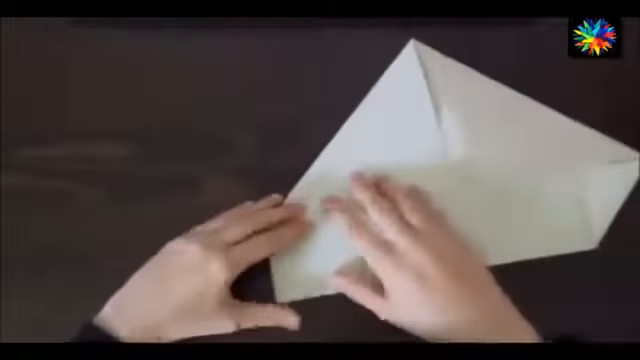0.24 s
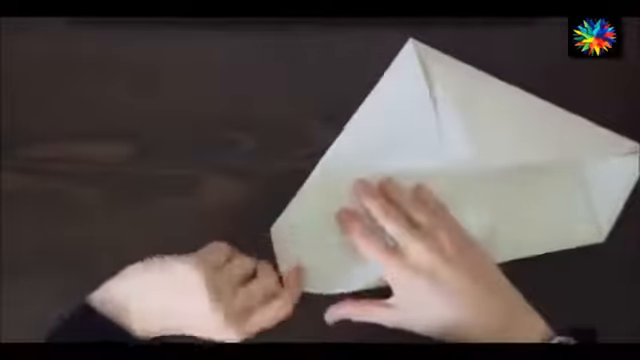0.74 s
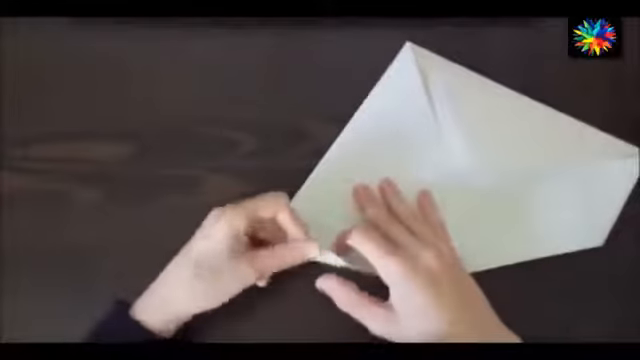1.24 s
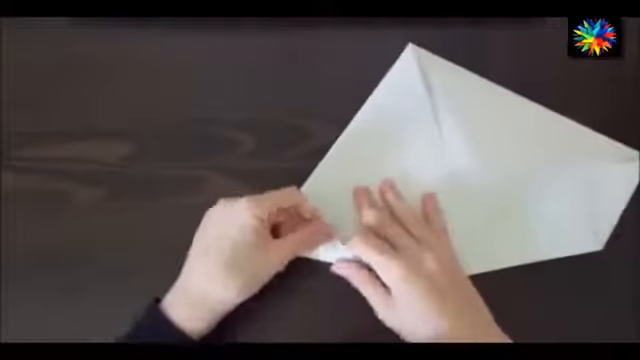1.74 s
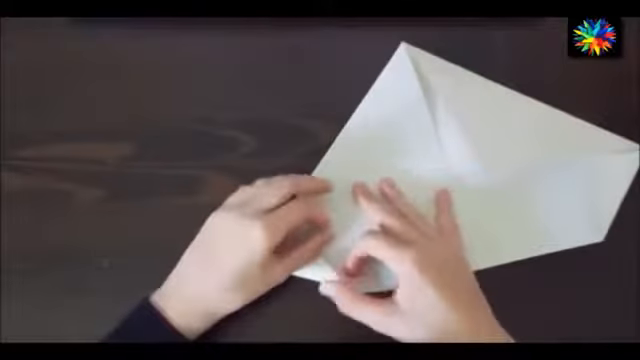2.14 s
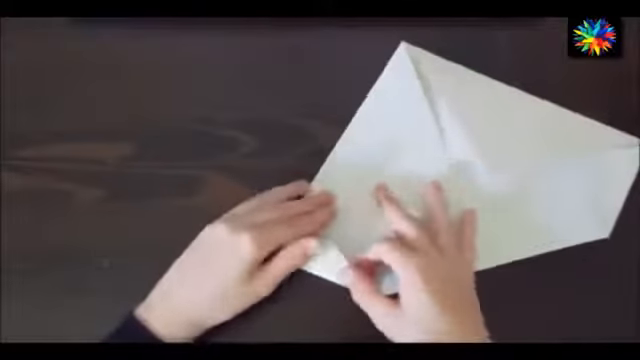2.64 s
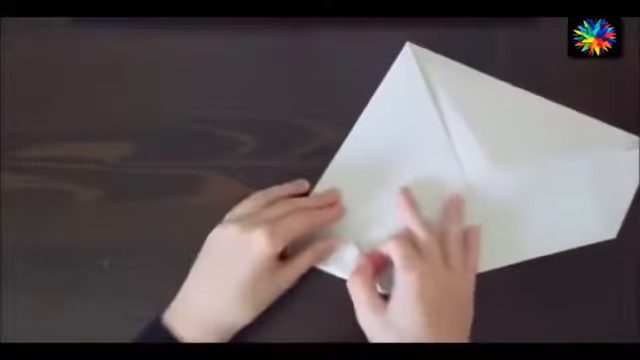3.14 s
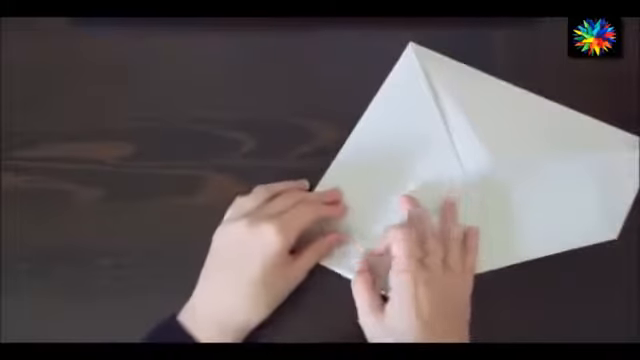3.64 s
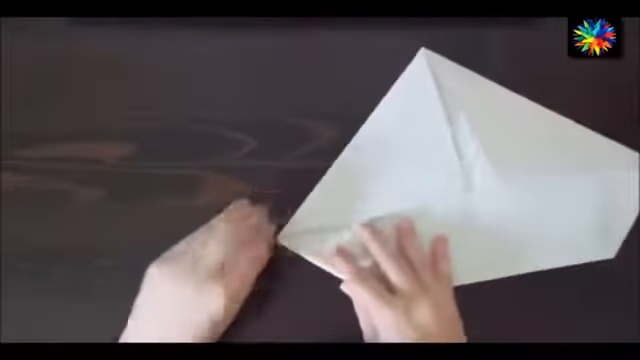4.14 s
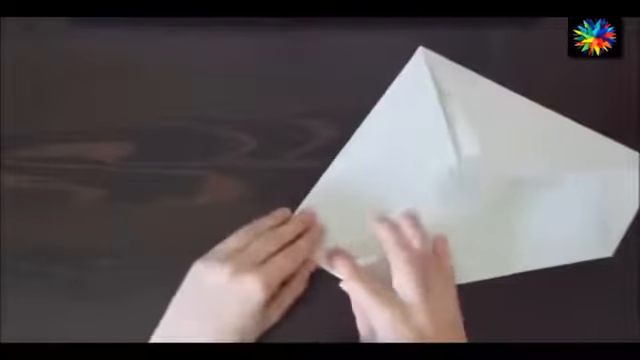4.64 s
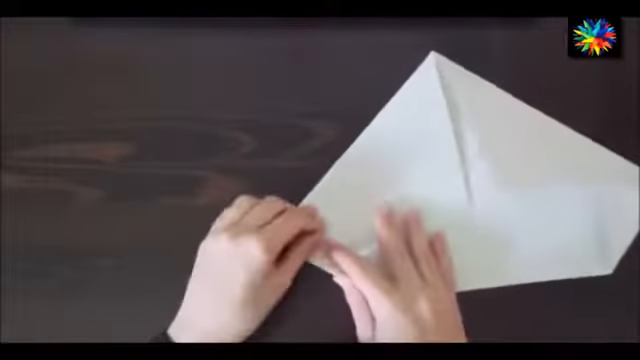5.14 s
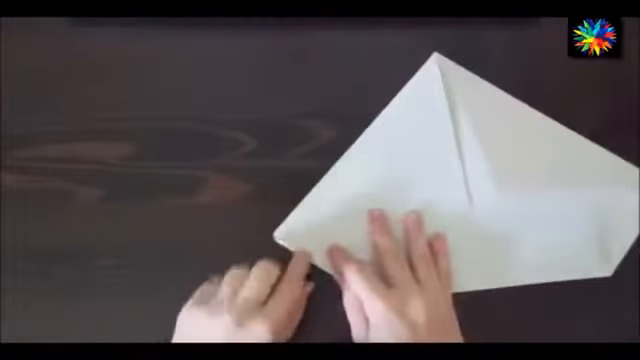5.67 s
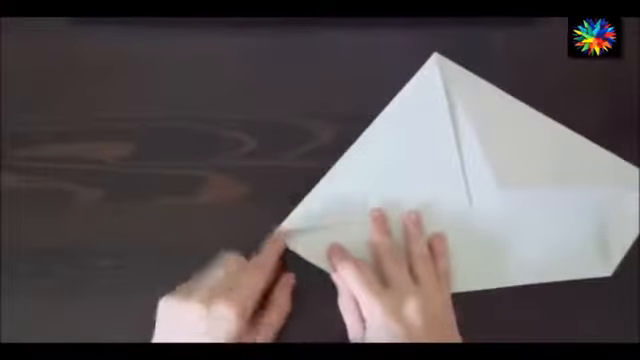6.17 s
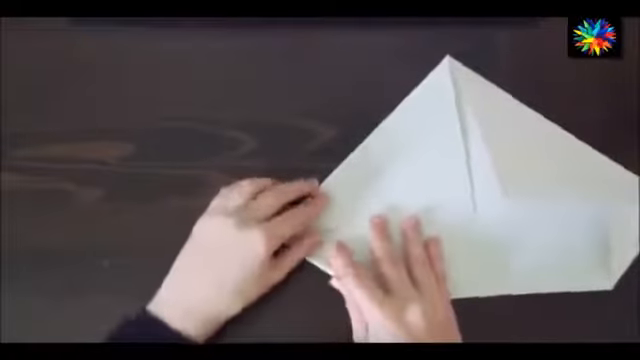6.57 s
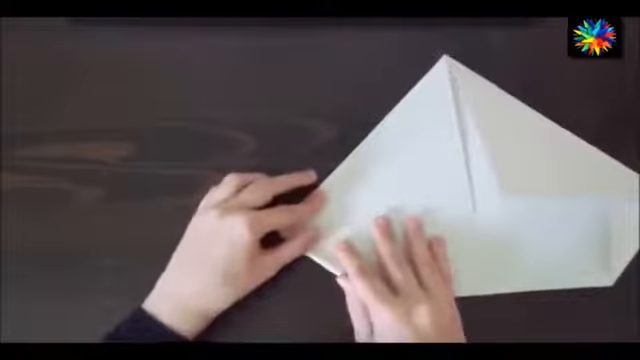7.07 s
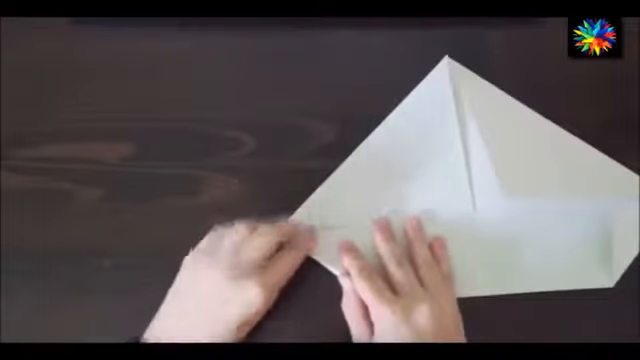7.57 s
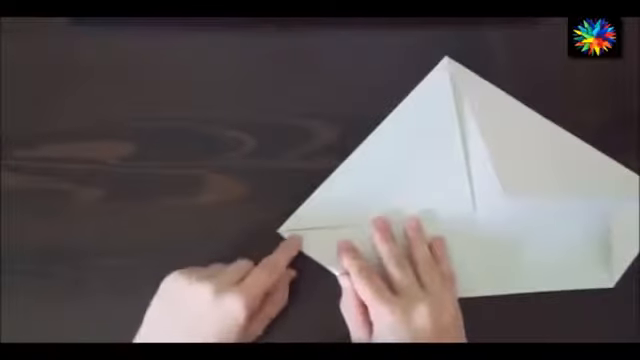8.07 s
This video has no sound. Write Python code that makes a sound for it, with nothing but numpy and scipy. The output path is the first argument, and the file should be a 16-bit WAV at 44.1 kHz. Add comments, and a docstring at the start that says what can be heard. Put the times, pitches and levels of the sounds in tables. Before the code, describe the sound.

Hands fold and crease the corner of a sheet of paper on a wooden table, close to the microphone. Fingers slide in short hissing strokes while the paper rasps and crackles, with one sharp snap standing out before the middle. Soft fingertip thuds and a few dull knocks from further off come in between. The rubbing grows fainter and sparser toward the end, in a small quiet room.

```python
"""A soft hiss of fingers sliding on paper comes first, with a tick, a thud and a short rasp.
Two hands are folding and creasing the corner of a sheet on a wooden table in a small quiet room.
The hiss comes from fibres that catch and let go. The sheet rasps as it bends and snaps sharply
where it buckles. Fingers land on the table with soft thuds, and a few dull knocks sound further off."""
import sys
import numpy as np
from scipy import signal
from scipy.fft import rfft, irfft
from scipy.io import wavfile
from scipy.ndimage import uniform_filter1d, minimum_filter1d, map_coordinates

SR = 44100
rng = np.random.default_rng(int(sys.argv[2]) if len(sys.argv) > 2 else 0)


def materialize(psi):
    """Save the field psi as 16-bit PCM at rate SR to the path in sys.argv[1].

    A 1-D psi becomes a single channel; in a 2-D psi each row is a channel.
    """
    bounded = np.clip(np.atleast_2d(psi).T, -1, 1)
    quanta = np.round(bounded * 32767).astype(np.int16)
    wavfile.write(sys.argv[1], SR, quanta)


N = 366471
TIME = np.arange(N) / SR

# moments when the sheet buckles: t/s, relative low, middle and treble level/dB, base decay/s, ring f/Hz
BUCKLES = [(0.0356, -62, -47.5, -52, 0.0007, 6500), (0.345, -47, -46, -40, 0.002, 8300),
           (0.362, -43, -29.5, -39, 0.00087, 3240), (0.8258, -70, -47, -39.5, 0.0058, 13000),
           (1.4595, -45, -46, -39.5, 0.0037, 9670), (1.7962, -54, -49, -51, .003, 10000),
           (1.828, -36.5, -55, -37, 0.0029, 13000), (1.8431, -30.5, -30.5, -23.5, 0.0027, 13000),
           (1.952, -40.5, -55, -28, 0.0048, 11100), (2.329, -34.5, -26.5, -25.5, 0.0026, 13300),
           (2.384, -68, -43, -37.5, 0.006, 11000), (2.5882, -46.5, -44, -42, 0.0071, 5550),
           (2.767, -38, -36.5, -35.5, 0.0033, 5360), (3.296, -20, -11.5, -9, 0.0016, 5750),
           (3.7212, -40, -38.5, -30, 0.0018, 12700), (3.9019, -34, -26, -35, 0.0016, 2010),
           (4.0952, -71, -65, -48, .0011, 7400), (4.6197, -65, -56, -49, 0.0013, 12400),
           (4.836, -67, -44.5, -42.5, 0.0012, 7340), (4.9936, -62, -60, -44.5, 0.0039, 10200),
           (5.121, -35, -26, -18.5, 0.0016, 9900), (5.7602, -37.5, -29, -19.5, 0.0018, 11700),
           (6.277, -61.5, -58, -50, 0.0035, 9900), (6.763, -56.5, -56, -66.5, .002, 3990),
           (7.592, -64, -65, -48.5, 0.0023, 11900), (7.7371, -76, -44, -40, 0.0028, 9600),
           (8.051, -63, -53.5, -51.5, 0.0045, 10700), (8.1652, -67, -58, -51, 0.0018, 12660)]


def from_db(db):
    """Turn decibels into a factor to multiply a sound by."""
    return 10 ** (np.asarray(db) / 20)


def rms_one(x):
    """Scale a signal so that its average strength (rms) is 1."""
    return x / np.sqrt(np.mean(x ** 2) + 1e-20)


def in_time(rows):
    """Join (time, value) points with straight lines, giving a value for every sample."""
    return np.interp(TIME, *np.transpose(rows))


def at_hz(points, size):
    """Join (frequency, value) points into a curve over the spectrum of a signal of this size."""
    hz, value = np.transpose(points)
    return np.interp(np.log(np.fft.rfftfreq(size, 1 / SR) + 1), np.log(hz), value)


def coloured(x, colour):
    """Give noise a colour, its balance of low and high; the result has strength 1."""
    size = x.shape[-1]
    return rms_one(irfft(rfft(x) * from_db(at_hz(colour, size)), size))


def band(x, low_hz, high_hz):
    """Let through what lies between two frequencies."""
    edges = [low_hz, min(high_hz, .45 * SR)]
    return signal.sosfilt(signal.butter(2, edges, "band", fs=SR, output="sos"), x)


def stereo_noise(likeness, size):
    """White noise whose left and right are more or less alike, depending on frequency."""
    mid, side = rfft(rng.standard_normal((2, size)))
    alike = np.clip(at_hz(likeness, size), 0, 1)
    return irfft(np.sqrt(1 + alike) * mid + np.sqrt(1 - alike) * side * [[1], [-1]], size)


def drift(rate_hz):
    """A smooth random wobble of strength 1; a higher rate makes it quicker."""
    pole = np.exp(-2 * np.pi * rate_hz / SR)
    return rms_one(signal.lfilter([1], [1, -2 * pole, pole * pole], rng.standard_normal(N)))


def add(out, sound, s):
    """Mix a sound in, starting at s seconds."""
    start = max(round(s * SR), 0)
    out[..., start:start + sound.shape[-1]] += sound[..., :N - start]


def struck(blows, tones):
    """Each blow rings all of an object's tones, a little differently; each fades 60 dB in its t60."""
    out, t = np.zeros(N), TIME[:SR // 4]
    hz, tone_db, t60 = np.transpose(tones)[:, :, None]
    for s, db in blows:
        strength_db = db + tone_db + rng.normal(0, 1, hz.shape)
        ringing = from_db(strength_db - 60 * t / t60) * np.sin(2 * np.pi * hz * t)
        add(out, ringing.sum(axis=0), s)
    return out


def background(air_db=7.0, rumble_db=2.5):
    """The quiet room: airy noise, a low rumble and a faint hum."""
    # loudness of the airy noise and of the rumble over time: t/s, relative level/dB
    air_levels = [(0.0, -56.5), (0.39, -57), (0.92, -58), (2.7, -56.5), (3.61, -60.5), (4.81, -60),
                  (6.01, -65.5), (8.3, -65.5)]
    rumble_levels = [(0.0, -60), (0.39, -51.5), (0.53, -54), (1.04, -59), (4.62, -66), (5.06, -60.5),
                     (5.43, -65.5), (8.28, -66), (8.3, -68)]
    # their colours: f/Hz, relative level/dB
    air_colour = [(59, -31), (100, -3), (287, -5.5), (556, -8.5), (698, -10), (1440, -14), (1850, -13.5),
                  (2970, -17.5), (3810, -16.5), (10300, -20), (13200, -16.5), (14000, -18.5)]
    rumble_colour = [(8, -12.5), (20, -2), (30, 7.5), (48, -9.5), (90, -4.5), (160, -20.5), (400, -46.5)]
    # how alike left and right are in both: f/Hz, likeness from 0 to 1
    likeness = [(30, 1), (120, 0.5), (300, .45), (1000, 0.4), (3000, 0.3), (14000, 0)]
    # steady hum of the mains and an appliance: f/Hz, rms level/dB
    hum_tones = [(60, -68), (120, -75), (210, -76)]
    air = coloured(stereo_noise(likeness, N), air_colour) * from_db(in_time(air_levels) + air_db)
    rumble = coloured(stereo_noise(likeness, N), rumble_colour)
    rumble *= from_db(in_time(rumble_levels) + rumble_db)
    hum = sum(from_db(db) * np.sqrt(2) * np.sin(2 * np.pi * (hz * TIME + rng.random()))
              for hz, db in hum_tones)
    return air + rumble + hum


def room_echoes(x, t60=0.2, gap_s=0.011, build_s=0.0056):
    """Many echoes come back from the walls after a short gap and die away quickly."""
    # how alike the echoes are left and right: f/Hz, likeness from 0 to 1
    likeness = [(500, 1), (2500, 0.98), (4500, 0.6), (8000, 0), (14000, 0)]
    # colour of the echoes: f/Hz, relative level/dB
    echo_colour = [(150, -9.5), (1100, 1.5), (2300, -2), (3800, 0.5), (6200, -2), (8000, -1.5), (14000, -4)]
    t = TIME[:SR // 2]
    echoes = coloured(stereo_noise(likeness, len(t)), echo_colour)
    echoes *= np.clip((t - gap_s) / build_s, 0, 1) * from_db(-60 * t / t60)
    echoes /= np.sqrt(np.sum(echoes ** 2) / 2)
    return signal.fftconvolve(np.broadcast_to(x, (2, N)), echoes, axes=1)[:, :N]


def distant_knocks():
    """Something further off is knocked and rings briefly with a dull sound."""
    # the knocks: t/s, relative level/dB
    blows = [(.413, -31), (.432, -49), (.486, -40), (1.2855, -33), (2.162, -33.5), (3.2552, -34.5),
             (3.5412, -38.5), (6.714, -51.5)]
    # the tones they ring with: f/Hz, relative level/dB, t60/s
    tones = [(363, -17, 0.23), (505, -11, .05), (617, 2, 0.024), (780, -21.5, .025), (948, -16.5, 0.032),
             (1220, -10.5, 0.0059)]
    return band(struck(blows, tones), 280, 1790)


def finger_thuds():
    """Fingers land on the table and set its low tones ringing."""
    # the landings: t/s, relative level/dB
    landings = [(.046, -39.5), (.356, -33.5), (1.945, -41), (3.288, -48), (3.897, -41), (3.935, -42),
                (5.85, -45.5), (6.538, -45), (7.765, -43.5)]
    # tones of the table top: f/Hz, relative level/dB, t60/s
    table_tones = [(98, -10, 0.24), (124.1, -6.5, 0.18), (182, -21, 0.062), (260, -15, 0.036)]
    return struck(landings, table_tones)


def paper_taps(tap_db=-6):
    """Each snap also flicks the paper against the table; so light a sheet gives off no bass."""
    # tones of one flick: f/Hz, relative level/dB, t60/s
    tap_tones = [(430, -6, 0.024), (620, -2, 0.013), (834, 0.5, 0.022)]
    flicks = [(s, low_db + tap_db) for s, low_db, *_ in BUCKLES]
    return band(struck(flicks, tap_tones), 450, 3000)


def flexing_rasps(fringe_db=-13, stutter_db=2.0):
    """The bent sheet stutters over the table and rings in one band of frequencies."""
    # the rasps: peak t/s, rise/s, fall/s, relative level/dB, centre f/Hz, width/octaves
    rasps = [(.061, 0.0064, 0.007, -33, 1900, 1.73), (.36, 0.0081, 0.0082, -42, 1600, 1.8),
             (1.141, 0.027, 0.051, -51, 3360, .5), (1.24, 0.043, 0.031, -52, 3160, 0.88),
             (1.42, 0.021, 0.015, -52.5, 3420, 0.5), (1.742, 0.0052, 0.012, -50.5, 2300, 1.3),
             (1.835, 0.017, 0.015, -44.5, 1930, 0.75), (1.902, 0.02, 0.05, -47, 2900, 2.5),
             (1.955, 0.0068, 0.0063, -33.5, 2500, 1.13), (2.042, 0.0096, 0.0056, -47, 2970, 1.7),
             (2.625, 0.023, 0.015, -44.5, 1630, 0.57), (2.766, 0.0074, 0.0095, -42, 1730, 1.1),
             (3.305, 0.0056, 0.013, -44, 1142, 0.67), (3.716, 0.0029, 0.0042, -44, 2060, 0.21),
             (4.265, 0.032, 0.0069, -48, 3980, 0.28), (4.688, 0.0085, 0.0089, -48.5, 1530, 1.7),
             (4.789, 0.011, 0.011, -51, 4270, 0.48), (4.86, 0.033, 0.025, -63, 1380, 0.96),
             (6.6, 0.0067, 0.02, -53.5, 900, 5.1), (7.77, 0.012, 0.021, -60, 1000, 4.3),
             (7.77, 0.089, 0.07, -62.5, 3750, 0.2)]
    out, t = np.zeros(N), TIME[:SR // 2] - 1 / 4
    stutter = from_db(stutter_db * drift(220))
    for s, rise, fall, db, hz, octaves in rasps:
        slips = rng.standard_normal(len(t))
        body = rms_one(band(slips, hz / 2 ** (octaves / 2), hz * 2 ** (octaves / 2)))
        fringe = rms_one(band(slips, hz / 3, hz * 2))
        swell = np.exp(1 - np.hypot(1, t / np.where(t < 0, rise, fall)))  # rounded peak at t = 0
        rasp = from_db(db) * swell * (body + from_db(fringe_db) * fringe)
        out += np.interp(TIME, s + t, rasp, left=0, right=0)
    return out * rms_one(stutter)


def wandering_resonances(x, depth_db=3.0, spacing_hz=330, change_s=.09):
    """The frequencies at which the sheet likes to ring shift as the fingers pin it at new places."""
    hz, s, spectra = signal.stft(x, SR, nperseg=512)
    places = np.meshgrid(hz / spacing_hz, s / change_s, indexing="ij")
    heights = map_coordinates(rng.standard_normal(size=(128, 256)), places, order=2, mode="mirror")
    gain = rms_one(from_db(depth_db * heights))
    return signal.istft(spectra * gain, SR)[1][..., :N]


def stroke_gains(speed_exponent=0.85, fidget_db=2.4, fidget_hz=8, resting_treble_db=-2):
    """Each stroke speeds up, then slows, and the hiss follows; gives gains for its dull and bright part."""
    # a finger or the sheet slides: start t/s, length/s, fastest point from 0 to 1,
    # relative level/dB, extra treble/dB
    strokes = [(0, 0.092, 0.46, -35.5, -1.5), (0.089, 0.25, 0.23, -34.5, 1), (0.329, 0.064, 0.53, -33, 1),
               (.39, 0.086, 0.55, -41.5, -2), (0.514, .055, .4, -53, 5), (0.588, 0.13, 0.81, -40, 1),
               (0.824, 0.074, 0.37, -37, -1), (0.89, 0.12, 0.83, -42, -3), (.981, 0.058, 0.28, -30.5, 5),
               (1.051, 0.16, 0.61, -37, -1.5), (1.171, 0.11, .72, -35, 2), (1.297, .15, 0.86, -42, -1),
               (1.453, 0.084, 0.03, -42, -5), (1.727, .035, .45, -44, 0), (1.789, 0.083, 0.56, -35, -1),
               (1.871, .13, 0.57, -33.5, 1.5), (2.014, .15, 0.8, -35, 1), (2.195, 0.045, .45, -43.5, -2),
               (2.298, 0.023, 0.4, -35, 4), (2.331, .08, 0.43, -37.5, -5), (2.577, .11, .13, -37, -1.5),
               (2.678, .18, 0.32, -39.5, -1), (2.971, 0.055, 0.46, -42, -0.5),
               (3.17, 0.21, 0.64, -40.5, -8), (3.47, 0.14, 0.65, -44.5, -1.5),
               (3.687, .065, 0.4, -39.5, -4), (3.795, 0.2, 0.5, -43, 0), (3.997, 0.19, 0.45, -43.5, 2),
               (4.14, 0.13, 1, -42, 10), (4.63, 0.13, 0.8, -49.5, -5), (4.765, 0.059, 0.46, -45.5, 3),
               (4.825, 0.1, 0.27, -47, -5), (4.971, 0.1, 0.16, -48, 0), (5.053, .2, 0.66, -48.5, -6),
               (5.382, 0.14, 0.26, -56, 2), (5.609, 0.24, 0.6, -43, 1), (5.927, .055, 0.07, -51.5, 0),
               (6.017, 0.041, 0.38, -50, 4.5), (6.297, .14, .65, -53, -3), (6.513, 0.15, 0.57, -49, -3),
               (6.75, 0.082, 0.3, -53.5, 2), (6.826, 0.089, .65, -45, -1), (7.475, 0.11, 0.3, -57, 3.5),
               (7.57, 0.12, 0.53, -48, 7), (7.694, 0.069, 0.6, -41.5, 1.5), (7.748, 0.18, 0.17, -48.5, 3.5)]
    # resting hands shift faintly on the sheet, less as the fold settles: t/s, relative level/dB
    resting_levels = [(0, -48.5), (1.35, -58), (1.62, -64), (2.45, -46), (2.9, -52), (3.65, -62),
                      (4.3, -49), (4.5, -71), (5.3, -59.5), (6.15, -78), (6.95, -71), (8.3, -80)]
    resting = from_db(in_time(resting_levels) + fidget_db * drift(fidget_hz))
    tilt = np.array([[-1], [1]]) / 2  # extra treble lowers the dull part and lifts the bright part
    power = (resting * from_db(tilt * resting_treble_db)) ** 2
    for s, length, fastest, db, treble_db in strokes:
        progress = TIME[:int(length * SR)] / length
        angle = np.interp(progress, [0, np.clip(fastest, .02, .98), 1], [0, np.pi / 2, np.pi])
        speed = np.abs(np.sin(angle))
        add(power, (speed ** speed_exponent * from_db(db + tilt * treble_db)) ** 2, s)
    return np.sqrt(power)


def sliding_hiss(catches_per_s=3000, spread_db=2.5, smooth=0.56, judder_db=1.3, width=.2, split_hz=6500):
    """Fibres catch and let go thousands of times a second, and the finger's grip judders."""
    # colour of the hiss: f/Hz, relative level/dB
    hiss_colour = [(200, -19), (600, -12.5), (1200, -12.5), (1900, -7), (2600, -5), (3600, -1.5),
                   (4600, -1.5), (6000, -2.5), (7200, -1.5), (9200, -0.5), (11000, -2), (13500, 0),
                   (16000, 2.5)]
    sizes = from_db(spread_db * np.minimum(rng.exponential(1, (2, N)), 5))
    catches = (rng.random((2, N)) < catches_per_s / SR) * sizes * rng.choice([-1, 1], (2, N))
    rubbing = catches + smooth * rng.standard_normal((2, N))
    mid, side = wandering_resonances(coloured(rubbing, hiss_colour))
    hiss = mid + width * band(side, 5000, 15000) * [[1], [-1]]  # left and right differ only in the treble
    dull = signal.sosfiltfilt(signal.butter(2, split_hz, fs=SR, output="sos"), hiss)
    bright = hiss - dull
    dull_gain, bright_gain = stroke_gains()
    return (dull * dull_gain + bright * bright_gain) * from_db(judder_db * drift(70))


def buckling_snaps(level_db=-1, flip_db=9, flip_s=.00045, ring_db=1, ring_q=4,
                   shiver_db=-22, shiver_s=0.01):
    """A patch of paper flips in under a millisecond and rings, then the sheet shivers briefly."""
    # the sheet's low, middle and treble range: bottom f/Hz, top f/Hz, decay factor, stereo width 0 to 1
    ranges = [(1308, 3030, 1.7, 0), (3360, 6670, 1.93, 0.39), (7770, 15000, 1.4, 0.45)]
    out, t = np.zeros((2, N)), TIME[:SR // 20]
    shiver = from_db(shiver_db) * np.exp(-t / shiver_s)
    for s, *levels_db, decay, ring_hz in BUCKLES:
        patch = signal.iirpeak(ring_hz, ring_q, fs=SR)
        # the shorter the snap, the more of it lies in the first flip
        flip = from_db(flip_db) * np.exp(-(t / flip_s) ** 2 - (decay / 0.0014) ** 2)
        for db, (low_hz, high_hz, longer, width) in zip(levels_db, ranges):
            shape = flip + np.exp(-t / (decay * longer)) + shiver
            jolts = rng.choice([-1, 1], (2, len(t))) * shape
            ring = from_db(ring_db) * signal.lfilter(*patch, jolts)
            mid, side = band(jolts + ring, low_hz, high_hz)
            crack = mid + width * side * [[1], [-1]]
            # the first 10 ms set the level
            crack /= np.sqrt(np.mean(crack[:, :SR // 100] ** 2, axis=1, keepdims=True))
            lag_s = 0.00059 * (np.sqrt(1000 / low_hz) - 1 / 2)  # low ripples cross the sheet last
            add(out, from_db(db + level_db) * crack, s + lag_s)
    return out


def scene(hiss_db=-1.0, near_echo_db=-15.5):
    """The paper is close by; the knocks are further off, so their echoes follow sooner and louder."""
    paper = from_db(hiss_db) * sliding_hiss() + flexing_rasps() + buckling_snaps() + paper_taps()
    near = paper + finger_thuds()
    knocks = distant_knocks()
    echoes = from_db(near_echo_db) * room_echoes(near) + room_echoes(knocks, t60=0.17, gap_s=.004)
    return near + knocks + echoes + background()


def record(dry, cutoff_hz=14250):
    """A fast limiter turns down any peak above full scale; then the highest treble is cut steeply."""
    allowed = 1 / np.maximum(np.abs(dry).max(axis=0), 1)
    gain = uniform_filter1d(minimum_filter1d(allowed, size=25), size=25)
    return signal.sosfilt(signal.ellip(12, .2, 90, cutoff_hz, fs=SR, output="sos"), dry * gain)


dry = scene()
out = record(dry)
materialize(out)
```